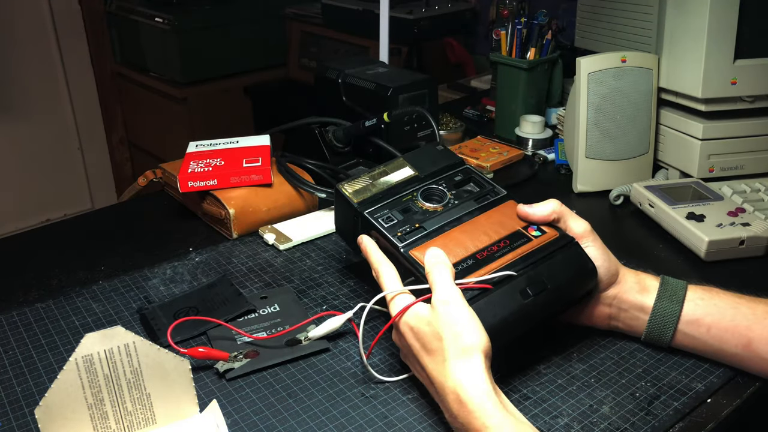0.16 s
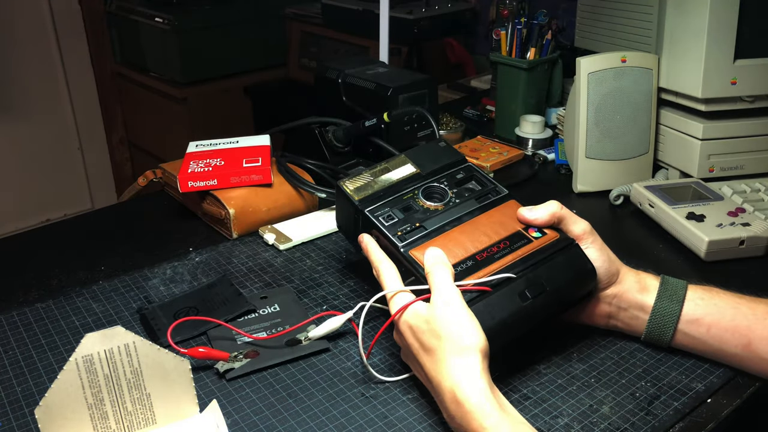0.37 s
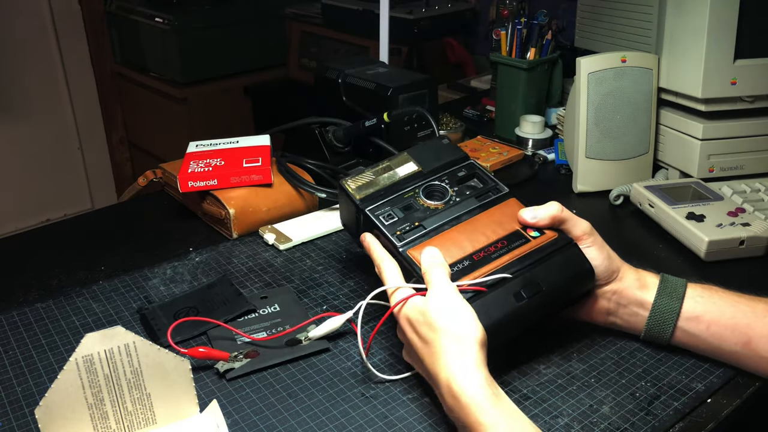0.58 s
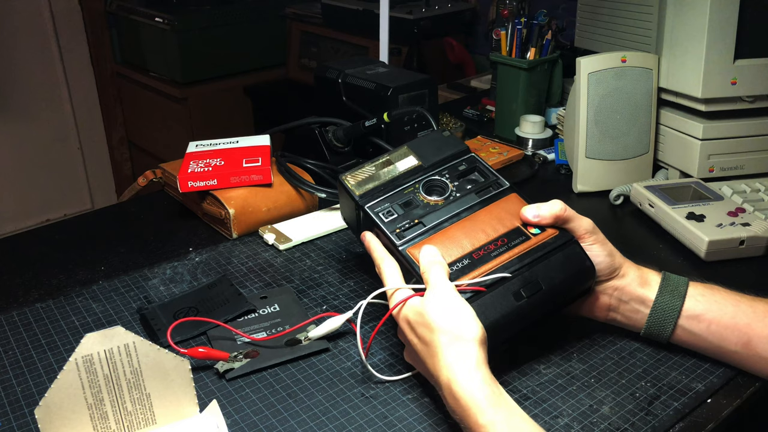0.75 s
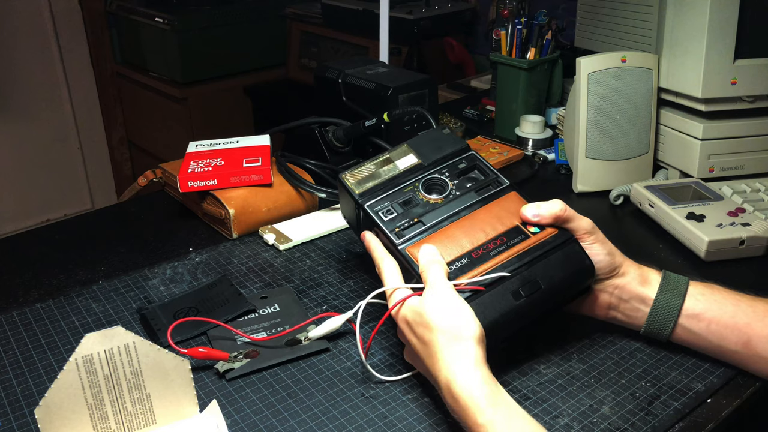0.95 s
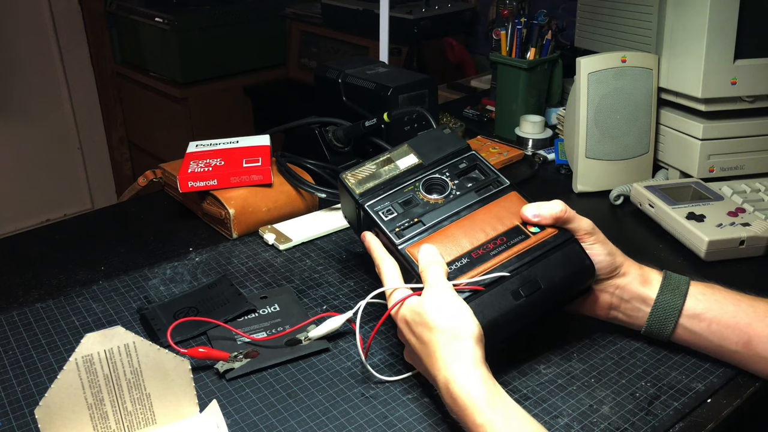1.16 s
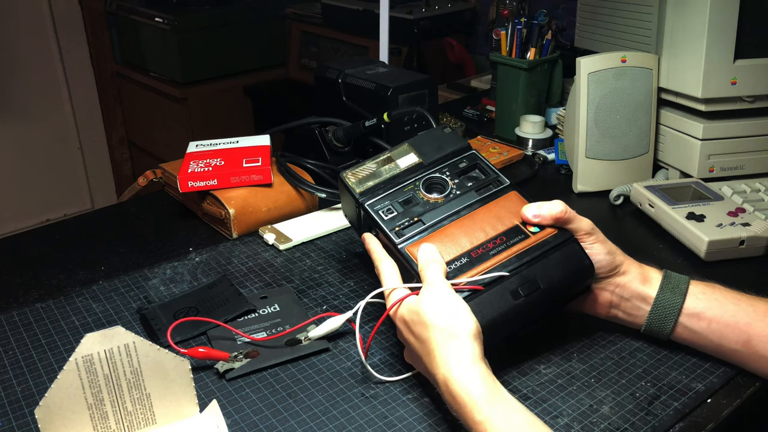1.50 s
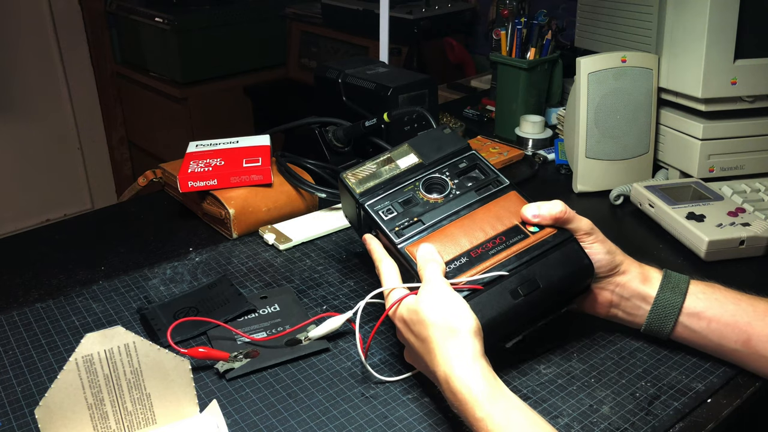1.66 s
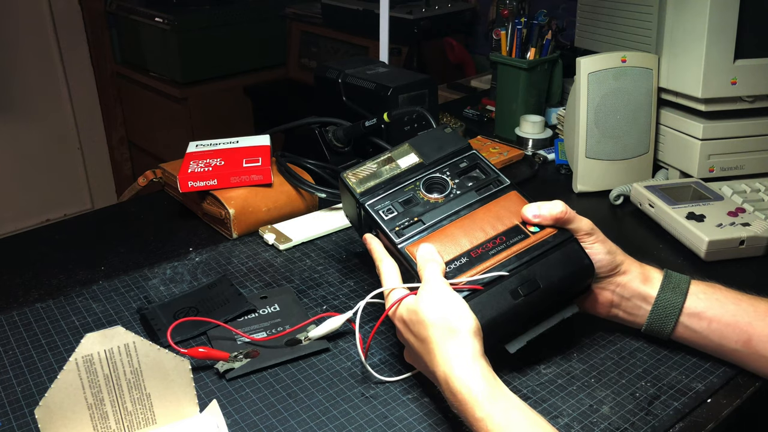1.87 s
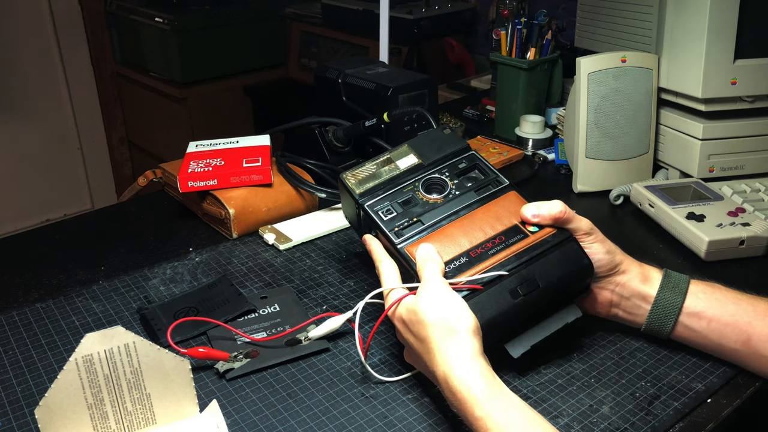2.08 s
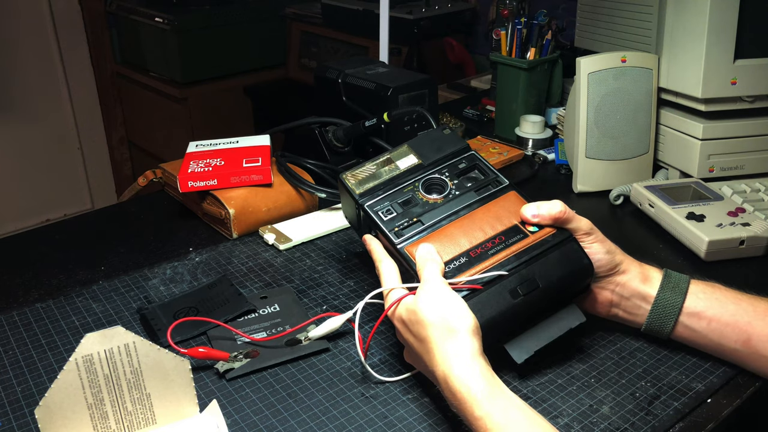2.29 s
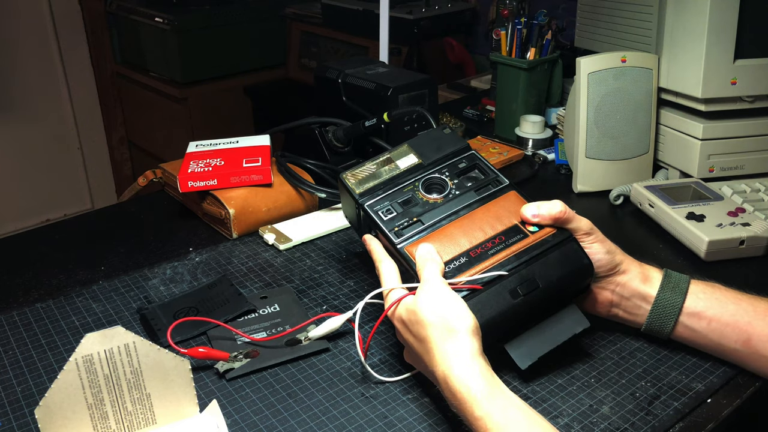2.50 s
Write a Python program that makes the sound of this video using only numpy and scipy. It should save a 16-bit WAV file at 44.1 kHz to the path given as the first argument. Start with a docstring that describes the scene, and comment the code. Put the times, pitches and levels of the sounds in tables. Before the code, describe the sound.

A small motor in a hand-held instant camera drives plastic gears, a fast, bright, ratcheting chatter over a rough buzzing hum, running without pause as the print slides out; close microphone in a quiet small room.

```python
"""A quiet room, where a small motor drives a plastic gear train inside a hand-held camera.
Once each turn of a loose gear (about 27 a second) the teeth slap and chatter: dense random clicks
drive resonances of gears and hollow case. Under them run the whirr of the mesh, made of coloured
clicks, and a rough hum on multiples of the tooth rate. A short echo and low room tone surround it."""
import sys
import numpy as np
from scipy import signal
from scipy.fft import rfft, irfft
from scipy.io import wavfile

SR = 44100
rng = np.random.default_rng(int(sys.argv[2]) if len(sys.argv) > 2 else 0)


def file_out(sig):
    """Save sig as 16-bit WAV at sys.argv[1]."""
    # one column per channel
    cols = np.atleast_2d(sig).T
    # limit, then scale
    lim = np.clip(cols, -1, 1)
    pcm = np.round(lim * 32767).astype(np.int16)
    wavfile.write(sys.argv[1], SR, pcm)


N = 116865
BOUT_N = SR // 10   # samples computed for each bout of chatter

# bouts of chatter, one per gear turn: start_s [s], level_db [dB], hold_s [s], ring_hz (centre of the ring) [Hz],
# treble_db [dB], thump_db (push on the case) [dB], mesh_db (whirr from this bout on) [dB]
BOUTS = [(0.0284, -34.5, 0.0043, 5170, -3.5, -32, -34), (0.078, -29.5, 0.014, 4800, -9, -34.5, -37),
         (0.0954, -23.5, 0.0033, 6500, -10, -28, -31), (0.1221, -19.5, 0.0073, 4730, -13, -30.5, -34),
         (0.159, -23.5, 0.0057, 4700, -18, -32, -48), (0.1745, -37, 0.0036, 4860.0, -9, -29, -34),
         (0.1958, -24.5, 0.019, 4460, -12, -32.5, -47), (0.2332, -27, 0.016, 5270, -9.5, -29.5, -35),
         (0.2885, -37, 0.013, 5160.0, -18, -29.5, -37), (0.3107, -26, 0.0065, 4460, -9.5, -33, -33.5),
         (0.3448, -25.5, 0.0092, 4330, -10, -27.5, -34), (0.3854, -38, 0.0053, 5700, -6, -35.5, -26.5),
         (0.4101, -26, 0.0068, 5600, -8, -31.5, -31), (0.4479, -18.5, 0.0033, 5540, -11.5, -27, -34.5),
         (0.4901, -26.5, 0.0019, 5300, -12, -29.5, -35.5), (0.5277, -21, 0.0056, 5400, -12, -31, -31.5),
         (0.5745, -24.5, 0.012, 5030, -8, -29, -33.5), (0.6246, -21.5, 0.006, 5430, -10, -33.5, -43),
         (0.6483, -30, 0.003, 5230, -13.0, -30.5, -52.5), (0.6772, -24.5, 0.01, 5500, -8.5, -30.5, -34.5),
         (0.7374, -27.5, 0.018, 4970, -9.5, -33, -33.5), (0.7975, -28, 0.0047, 4630, -18, -33, -36.5),
         (0.8325, -26.5, 0.0074, 5400, -7.5, -30.5, -34.5), (0.8736, -24.5, 0.011, 5400, -7.5, -32, -33.5),
         (0.917, -33, 0.007, 5160, -7, -32.5, -31.5), (0.9513, -23.5, 0.006, 4800, -10, -29, -33),
         (0.9901, -25.5, 0.007, 4900, -8, -33, -33), (1.057, -25.5, 0.016, 5440, -11, -31.5, -33.5),
         (1.0942, -23, 0.009, 5600, -11, -31.5, -33.5), (1.1348, -23, 0.0048, 5500, -11, -30, -37),
         (1.1706, -26, 0.0075, 5600, -8.5, -29.5, -35.5), (1.2114, -22, 0.007, 5330, -13.5, -34.5, -33.5),
         (1.2531, -25, 0.0061, 5860, -8, -31.5, -35), (1.289, -23.5, 0.012, 5800, -11.5, -28.5, -34.5),
         (1.3316, -23.5, 0.0079, 5560, -9.0, -31.5, -34), (1.3745, -24.5, 0.0048, 5700, -7, -33, -33.5),
         (1.4096, -24, 0.013, 5900, -8.5, -30, -33), (1.4513, -22.5, 0.0047, 5850, -9, -30.5, -33.5),
         (1.4901, -26.5, 0.0062, 5800, -8.5, -34, -35), (1.5271, -25, 0.0031, 5460, -10, -27, -33.5),
         (1.5651, -25, 0.011, 6300, -10.5, -30.5, -33.5), (1.6379, -26, 0.015, 5400, -10, -30.5, -35),
         (1.6768, -23.5, 0.017, 5870, -10.5, -30, -35.5), (1.7206, -23.5, 0.0038, 5760, -13, -28, -38.5),
         (1.7481, -27.0, 0.0099, 5500, -10, -32.5, -34), (1.786, -28.5, 0.015, 5670, -9.0, -31.5, -33.5),
         (1.8199, -24.5, 0.0077, 5550, -12, -30, -34.5), (1.856, -21.5, 0.0059, 5840, -13, -33.5, -34),
         (1.8943, -26, 0.002, 5900, -11.0, -31.5, -35), (1.9276, -27, 0.022, 6170, -9, -31, -36.5),
         (1.9673, -31, 0.012, 5740, -11, -32.5, -33.5), (2.0061, -23.5, 0.005, 5890.0, -11.5, -31.5, -33.5),
         (2.038, -27.5, 0.016, 5430, -13, -29, -34.5), (2.0752, -24, 0.012, 5900, -14, -30, -36.5),
         (2.1147, -25.5, 0.0059, 5640, -17, -31.5, -32.5), (2.1495, -26.5, 0.0082, 5700, -13, -29, -31.5),
         (2.1837, -23, 0.015, 5840, -12.5, -32.5, -34.5), (2.2206, -25.5, 0.0017, 5700, -11, -32, -34),
         (2.2548, -24, 0.012, 5800, -15, -29, -31.5), (2.2893, -22.5, 0.013, 5700, -11, -31.5, -33),
         (2.328, -28, 0.0093, 5270, -14, -34, -34.5), (2.3631, -28.0, 0.0083, 5170, -14, -30, -34),
         (2.3972, -26, 0.011, 6300, -7, -32, -32), (2.4419, -25, 0.0026, 5500, -11.5, -32, -34.5),
         (2.4712, -22, 0.0023, 5630, -13.0, -30, -33), (2.5049, -23.5, 0.011, 5730, -11.5, -30, -35),
         (2.5415, -23.5, 0.012, 5440, -11.0, -31.5, -35.5), (2.5741, -23.5, 0.013, 5200, -13, -31, -35),
         (2.6112, -26.5, 0.016, 5840, -9.0, -32, -32.5)]
# resonances of gears and frame: pitch_hz [Hz], width_hz [Hz], level_db [dB]
GEAR_RESONANCES = [(3616, 91, 2), (4256, 180, 8), (4510, 69, 5), (4750, 145, 8), (5230, 285, 1),
                   (5674, 304, 5), (6170, 380, 2.5), (6800, 200, 8.5), (6780, 630, 2.5), (7910, 82, 7)]
# teeth meshing per second: time_s [s], rate_hz [Hz]
TOOTH_RATE_CURVE = [(0, 287), (.15, 295), (.3, 283), (.48, 278), (1.7, 279), (1.93, 288), (2.1, 279),
                    (2.65, 281)]

ATTACK_S, FADE_DB_PER_S, THUMP_FADE_DB_PER_S = 0.00066, 769, 456
CONTACTS_PER_S, CONTACT_SPREAD_DB, LUMPY_DB, LUMPS_PER_S = 9000, 1, 2, 177
TEETH_DB, RING_DB, RING_WIDTH_HZ, BOUT_VARIES_DB = -6.5, -1.5, 860, 1
TOOTH_DIP_DB, TOOTH_SLIP, TOOTH_VARIES_DB = 8.5, .15, 1   # slip in teeth
CASE_STEADY_DB = -3.5   # share of the case's push that does not fade with the bout
CASE_LOW_CUT_HZ, CASE_WAVERS_DB, WAVERS_PER_S = 326, 1.3, 25
HUM_WIDTH_HZ = 14   # blur of the first multiple, growing with the multiple
ROOM_TONE_DB, ROOM_T60_S, ROOM_DB = -73, 0.03, -19.5
CUTOFF_HZ = 15800


def amp(db):
    """Decibels to linear gain."""
    return 10 ** (np.asarray(db) / 20)


def rms_one(x):
    """Scale a signal to rms 1."""
    return x / np.sqrt(np.mean(x ** 2) + 1e-20)


def drift(rate):
    """Low-passed noise of rms 1: a random wander, faster as the rate [Hz] rises."""
    r = np.exp(-2 * np.pi * rate / SR)
    noise = rng.standard_normal(N + SR)
    wander = signal.lfilter([1], [1, -2 * r, r * r], noise)
    return rms_one(wander[SR:])   # the filter has settled by then


def resonate(x, hz, width_hz):
    """Two-pole resonance, gain about 1 at its peak."""
    r = np.exp(-np.pi * width_hz / SR)
    feedback = [1, -2 * r * np.cos(2 * np.pi * hz / SR), r * r]
    return signal.lfilter([(1 - r * r) / 2, 0, (r * r - 1) / 2], feedback, x)


def colour(x, spectrum):
    """Short minimum-phase filter of the given shape; white input keeps its rms."""
    hz, db = np.transpose(spectrum)
    grid = np.linspace(1, SR / 2, 2049)
    shape_db = np.interp(np.log(grid), np.log(hz), db, left=db[0] - 30, right=db[-1])
    cepstrum = irfft(np.log(amp(shape_db)))
    # fold the cepstrum forward in time so that the filter is causal
    cepstrum[1:2048] *= 2
    cepstrum[2049:] = 0
    taps = irfft(np.exp(rfft(cepstrum)))
    return signal.fftconvolve(x, taps / np.sqrt(np.sum(taps ** 2)))[:N]


def low_cut(x, order):
    """Remove what lies below the low cut of the case."""
    return signal.sosfilt(signal.butter(order, CASE_LOW_CUT_HZ, "high", fs=SR, output="sos"), x)


def room_tone():
    """Faint low rumble of the room: coloured, band-passed noise."""
    # spectrum of the rumble: pitch_hz [Hz], density_db [dB per Hz, relative]
    rumble_colour = [(20, -12), (60, -2), (125, -2.5), (260, 6.5)]
    band = signal.butter(3, [38, 270], "band", fs=SR, output="sos")
    rumble = signal.sosfilt(band, colour(rng.standard_normal(N), rumble_colour))
    return amp(ROOM_TONE_DB) * rms_one(rumble)


def room(x):
    """Echo of the room: a short, evenly decaying tail of dulled noise."""
    t = np.arange(SR // 4) / SR
    dulled = signal.lfilter([1], [1, -.4], rng.standard_normal(len(t)))
    tail = dulled * amp(-60 * t / ROOM_T60_S) * (t > .004)
    return amp(ROOM_DB) * signal.fftconvolve(x, tail / np.sqrt(np.sum(tail ** 2)))[:N]


def hum():
    """Rough narrow tones on multiples of the tooth rate: sine and cosine of wandering strength."""
    # loudness of the hum: time_s [s], level_db [dB]
    hum_level = [(0, -45.5), (.15, -38.5), (0.301, -45), (.48, -41), (.8, -51.5), (1.05, -43), (1.4, -38.5),
                 (1.75, -49), (1.95, -42), (2.2, -49.5), (2.55, -42), (2.65, -44)]
    # its tones: multiple [of the tooth rate], level_db [dB]
    hum_orders = [(2, -8.5), (3, 1.5), (4, -8), (6, -19)]
    t = np.arange(N) / SR
    phase = 2 * np.pi * np.cumsum(np.interp(t, *np.transpose(TOOTH_RATE_CURVE))) / SR
    tones = np.zeros(N)
    for k, db in hum_orders:
        sine = drift(k * HUM_WIDTH_HZ) * np.sin(k * phase)
        cosine = drift(k * HUM_WIDTH_HZ) * np.cos(k * phase)
        tones += amp(db) * (sine + cosine)
    return amp(np.interp(t, *np.transpose(hum_level))) * tones


def contacts():
    """Dense clicks of uneven size and random sign that come in lumps; rms 1."""
    spread = np.minimum(rng.exponential(1, N), 3.5)
    sizes = amp(CONTACT_SPREAD_DB * spread) * rng.choice([-1, 1], N)
    struck = rng.random(N) < CONTACTS_PER_S / SR
    lumps = amp(LUMPY_DB * np.clip(drift(LUMPS_PER_S), -2, 2))
    return rms_one(sizes * struck * lumps)


def bout_span(start_s):
    """Samples that one bout covers."""
    return slice(int(start_s * SR), int(start_s * SR) + BOUT_N)


def bout(hold_s, fade_db_per_s):
    """Loudness of one bout: fast attack, hold, even fade in dB."""
    t = np.arange(BOUT_N) / SR
    return np.clip(t / ATTACK_S, 0, 1) * amp(-fade_db_per_s * np.maximum(t - hold_s, 0))


def mesh_whirr():
    """Running mesh of the teeth: coloured contacts whose level steps with each bout."""
    # spectrum of the whirr: pitch_hz [Hz], density_db [dB per Hz, relative]
    whirr_colour = [(880, -39), (1500, 1.5), (1660, -2), (2100, -5), (2490, -0.5), (6370, -3.5), (8400, -9),
                    (15100, -16.5), (16000, -15)]
    level = np.full(N + SR, amp(BOUTS[0][6]))
    for start_s, *_, mesh_db in BOUTS:
        level[bout_span(start_s)] = amp(mesh_db)
    return level[:N] * colour(contacts(), whirr_colour)


def case(hits):
    """Contacts and noise shake the hollow case; each of its resonances wavers on its own."""
    # resonances of the case: pitch_hz [Hz], width_hz [Hz], level_db [dB]
    case_resonances = [(297, 54, -14.5), (390, 52, -8.5), (513, 61, -7.5), (581.4, 58.5, -4),
                       (853, 354, -8), (1045, 80, 1.5), (1133, 110, -0.5), (1305, 130, -3.5),
                       (1495, 87, -6.5), (1572, 99, -0.5), (1644, 158, -0.5), (2440, 46, -5.5)]
    thump = np.full(N + SR, amp(BOUTS[0][5] + CASE_STEADY_DB))
    for start_s, _, hold_s, _, _, thump_db, _ in BOUTS:
        fading = bout(hold_s, THUMP_FADE_DB_PER_S)
        thump[bout_span(start_s)] = amp(thump_db) * np.hypot(fading, amp(CASE_STEADY_DB))
    push = thump[:N] * rms_one(hits + rng.standard_normal(N))
    rings, power = np.zeros(N), 0
    for k, (hz, width_hz, db) in enumerate(case_resonances):
        wavering = amp(db + CASE_WAVERS_DB * drift(WAVERS_PER_S))
        rings += (-1) ** k * resonate(push * wavering, hz, width_hz)   # neighbours in opposite sign
        power += amp(2 * db) * width_hz * np.pi / SR
    return low_cut(rings / np.sqrt(power), 6)


def tooth_by_tooth(start_s, slips):
    """Saw-shaped gain: each tooth lands hard and fades, a little off time and of its own strength; rms 1."""
    teeth = np.arange(BOUT_N) / SR * np.interp(start_s, *np.transpose(TOOTH_RATE_CURVE))
    lateness = np.cumsum(slips) - slips[0]
    teeth = teeth + TOOTH_SLIP * np.interp(teeth, np.arange(len(slips)), lateness)
    tooth_index = np.clip(teeth.astype(int), 0, len(slips) - 1)
    strength_db = TOOTH_VARIES_DB * slips[::-1][tooth_index]
    strength_db = np.where(teeth < 1, np.abs(strength_db), strength_db)   # the first never lands softly
    return rms_one(amp(strength_db - TOOTH_DIP_DB * (teeth % 1)))


def ring(hits, centre_hz, varies_db):
    """Gear resonances near the centre ring most; each bout excites them a little differently."""
    hz, width_hz, db = np.transpose(GEAR_RESONANCES)
    near = 1 / np.hypot(1, (hz - centre_hz) / RING_WIDTH_HZ)
    gains = near * amp(db + varies_db)
    rings = sum((-1) ** k * gains[k] * resonate(hits, hz[k], width_hz[k]) for k in range(len(hz)))
    return rings / np.sqrt(np.sum(gains ** 2 * width_hz) * np.pi / SR)


def chatter(hits):
    """Bouts of slapping teeth: coloured contacts, their treble and the gears they set ringing."""
    # colour of the contacts: pitch_hz [Hz], density_db [dB per Hz, relative]
    teeth_colour = [(1060, -27), (1800, 8.5), (2090, 3), (2420, 6), (3340, 2), (4440, 1.5), (6380, 3.5),
                    (9000, -2), (11700, -40.5)]
    # colour of their treble: pitch_hz [Hz], density_db [dB per Hz, relative]
    treble_colour = [(7000, 4.5), (8500, -0.5), (10000, 0.5), (11000, 2), (13000, -2.5), (14500, 1.5),
                     (15200, 0), (16000, -21)]
    room_to_end = np.zeros(SR)   # lets the last bout run past the end
    teeth = np.r_[colour(hits, teeth_colour), room_to_end]
    treble = np.r_[colour(hits, treble_colour), room_to_end]
    hits = np.r_[hits, room_to_end]
    varies_db = BOUT_VARIES_DB * rng.standard_normal((len(BOUTS), len(GEAR_RESONANCES)))
    slips = rng.standard_normal((len(BOUTS), 32))
    out = np.zeros(N + SR)
    for row, varies, slip in zip(BOUTS, varies_db, slips):
        start_s, level_db, hold_s, ring_hz, treble_db, _, _ = row
        span = bout_span(start_s)
        shape = bout(hold_s, FADE_DB_PER_S) * tooth_by_tooth(start_s, slip)
        broad = shape * (amp(TEETH_DB) * teeth[span] + amp(treble_db) * treble[span])
        ringing = amp(RING_DB) * ring(shape * hits[span] + 1e-18, ring_hz, varies)
        out[span] += amp(level_db) * (broad + ringing)
    return out[:N]


def gears():
    """The same contacts chatter and shake the case, while the mesh runs on."""
    hits = contacts()
    return low_cut(chatter(hits) + mesh_whirr(), 4) + case(hits)


def scene():
    """Camera, its echo and the room tone."""
    camera = gears() + hum()
    return (camera + room(camera) + room_tone())[None]


def record(dry):
    """A steep low-pass cuts the top."""
    return signal.sosfilt(signal.ellip(12, .3, 60, CUTOFF_HZ, fs=SR, output="sos"), dry)


dry = scene()
out = record(dry)
file_out(out)
```